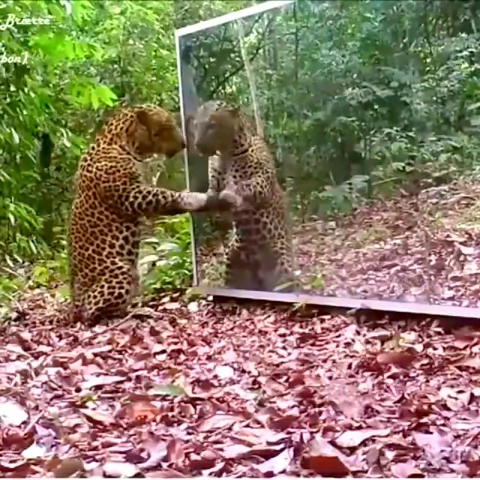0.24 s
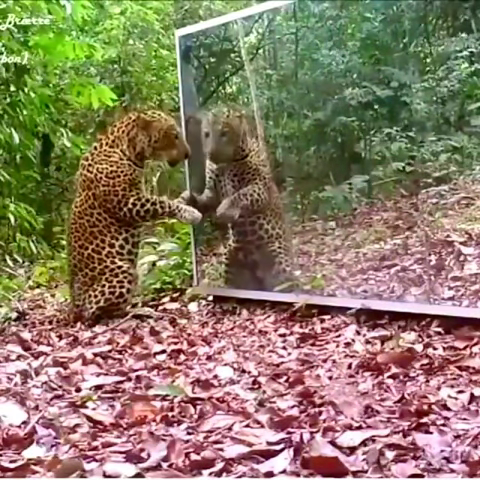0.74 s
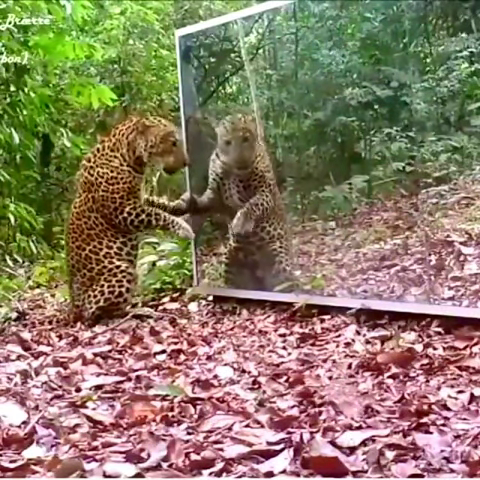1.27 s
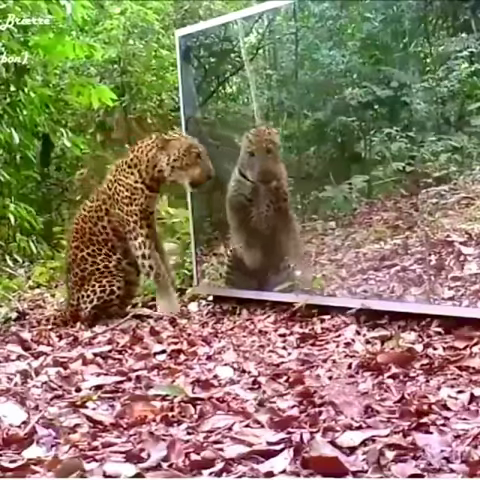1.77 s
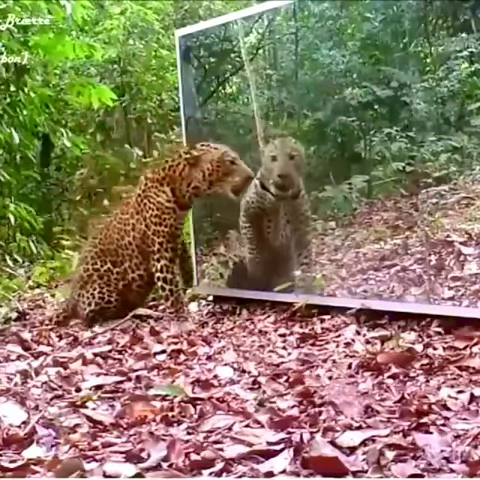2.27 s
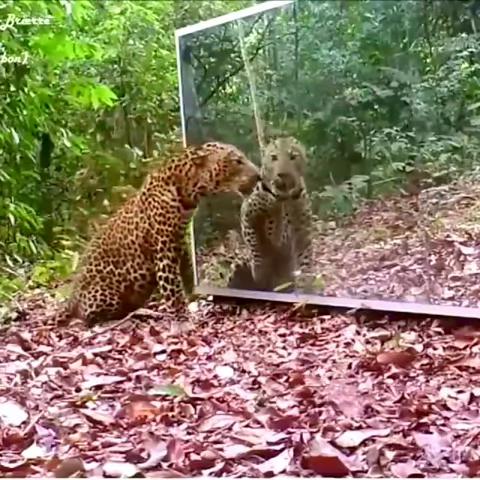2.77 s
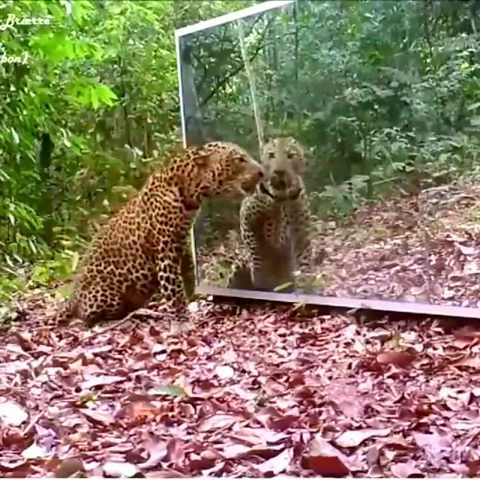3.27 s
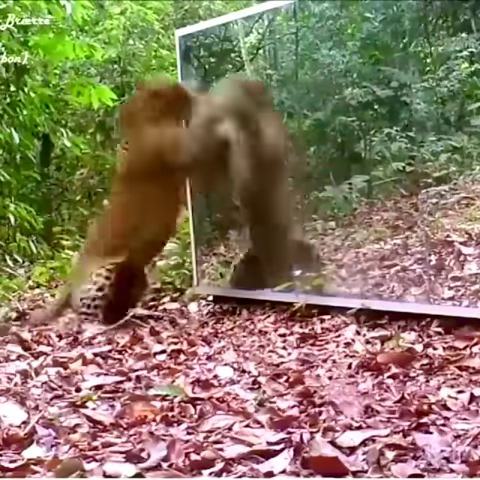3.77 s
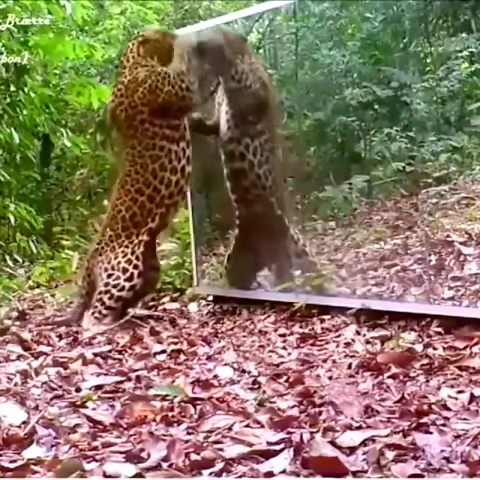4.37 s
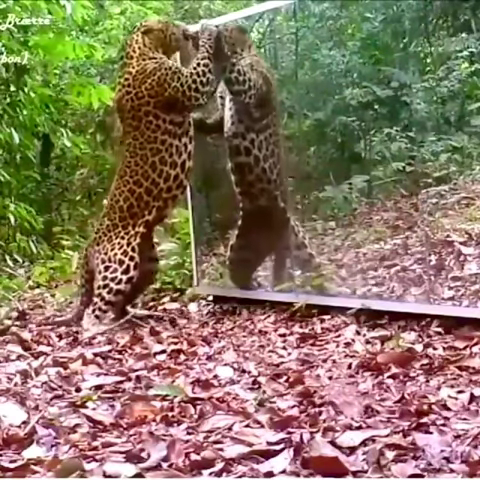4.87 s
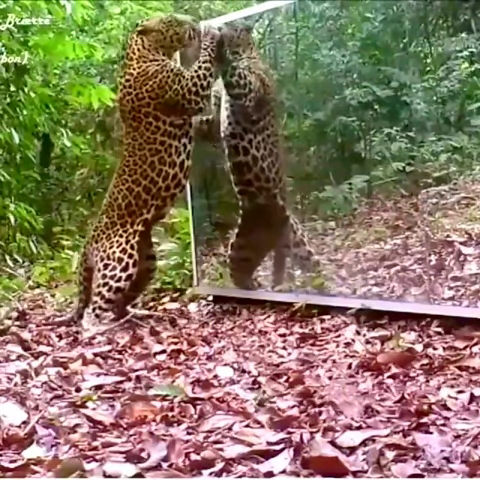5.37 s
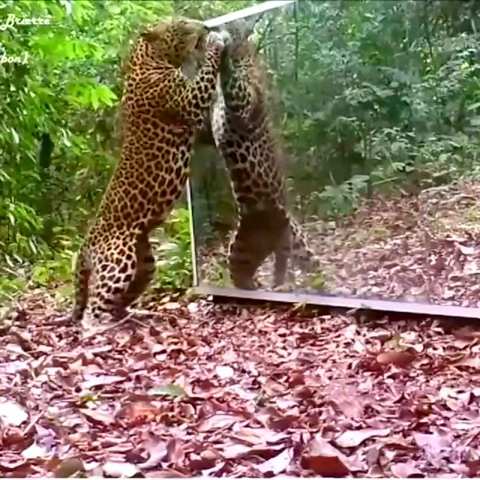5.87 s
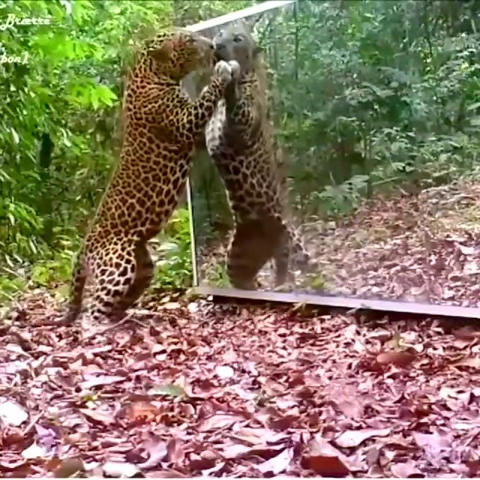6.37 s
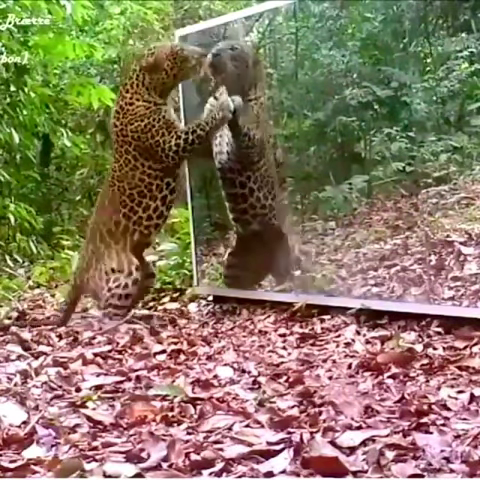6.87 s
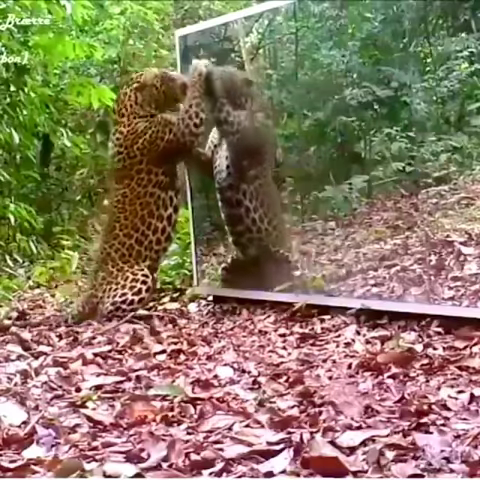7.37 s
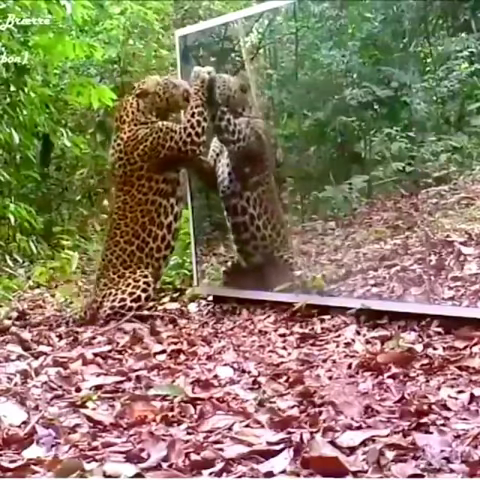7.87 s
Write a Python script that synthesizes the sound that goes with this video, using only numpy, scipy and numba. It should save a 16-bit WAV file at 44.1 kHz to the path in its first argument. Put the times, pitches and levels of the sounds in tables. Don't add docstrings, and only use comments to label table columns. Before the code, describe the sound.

A leopard close to the microphone purrs low, bursts into a loud rattling growl, then snarls and snaps amid hissing forest insects.

```python
import sys
import numpy as np
from scipy import signal
from scipy.fft import rfft, irfft, next_fast_len
from scipy.io import wavfile
from scipy.ndimage import uniform_filter1d, map_coordinates
from numba import njit

SR = 44100
rng = np.random.default_rng(int(sys.argv[2]) if len(sys.argv) > 2 else 0)


def generate_wav(sig):
    pcm = np.round(np.clip(np.atleast_2d(sig).T, -1, 1) * 32767).astype(np.int16)
    wavfile.write(sys.argv[1], SR, pcm)


def ratio_of_db(decibels):
    return 10 ** (np.asarray(decibels, float) / 20)


N = 358265


def unit(x):
    return x / np.sqrt(np.mean(x ** 2) + 1e-20)


def curves(rows):
    s, *cols = np.transpose(rows)
    return [np.interp(np.arange(N) / SR, s, c) for c in cols]


def wobble(rate):
    knots = rng.standard_normal(int(N * rate / SR) + 4)
    return map_coordinates(knots, [np.arange(N) * rate / SR])


def filtered(x, response):
    m = next_fast_len(N + SR // 2)
    return irfft(rfft(x, m) * response(np.fft.rfftfreq(m, 1 / SR)), m)[..., :N]


def soft_band(f, hz, width_hz):
    return (1j * f * width_hz / (hz ** 2 - f * f + 1j * f * width_hz)) ** 2


def echoes(x, t60):
    tail = rng.standard_normal(SR // 2) * ratio_of_db(-60 * np.arange(SR // 2) / SR / t60)
    return signal.fftconvolve(x, tail / np.linalg.norm(tail))[:N]


# f/Hz, level/dB per Hz
FOREST = [(15, -32), (25, 11), (252, -2), (288, -6), (346, -3.5), (781, -9), (1410, -9), (2420, -15.5),
          (3900, -15), (5600, -26), (7280, -61.5), (12300, -120)]
FOREST_DB = -38
# f/Hz, width/Hz, level/dB, waver/dB
INSECTS = [
    (1428, 37, -56.5, 2),
    (2310, 560, -47, 2),
    (3920, 180, -52.5, 2.5),
]


def forest():
    f, db = np.transpose(FOREST)
    air = filtered(rng.standard_normal(N), lambda hz: ratio_of_db(np.interp(np.log(hz + 1), np.log(f), db)))
    sound = ratio_of_db(FOREST_DB - 1.5 + .8 * wobble(3)) * unit(air)
    for hz, width_hz, level_db, waver_db in INSECTS:
        band = filtered(rng.standard_normal(N), lambda f: np.exp(-((f - hz) / width_hz) ** 2))
        sound += ratio_of_db(level_db + waver_db * (wobble(3.0) + wobble(13))) * unit(band)
    return sound


# t/s, peak level/dB
CHIRPS = [
    (0.21, -29),
    (4.302, -31.5),
    (5.201, -34),
    (7.807, -32),
]


def bird():
    t = np.arange(int(.035 * SR)) / SR
    hz = 2480 - 300 * np.exp(-t / 0.015)
    note = np.sin(2 * np.pi * np.cumsum(hz) / SR) * np.sin(np.pi * t / t[-1]) ** 0.085
    calls = np.zeros(N + len(t))
    for s, db in CHIRPS:
        calls[round(s * SR):][:len(t)] += ratio_of_db(db) * note
    return calls[:N] + 1.3 * echoes(calls[:N], t60=1.0)


# t/s, peak level/dB, f/Hz
FLUTTERS = [(1.773, -5.5, 2060), (1.796, -18, 2490), (1.808, -7, 2095), (1.858, -8.5, 2070),
            (1.93, -17, 2000), (1.98, -12, 2074), (2.008, -12, 2040), (2.02, -6, 2077), (2.034, -9.5, 2064),
            (2.068, -12, 2040), (2.101, -6, 2035), (2.146, -8, 1970), (2.186, -15, 1985),
            (2.235, -17, 2040), (2.272, -20.5, 1980), (6.55, -20, 1840), (6.62, -21.5, 2610),
            (6.892, -12.5, 2630), (6.929, -12, 1960), (6.942, -12, 2110), (6.955, -14, 1854),
            (7.025, -9, 1934), (7.036, -16, 1895), (7.11, -17, 2624), (7.125, -15, 2170)]
FLUTTER_S = 0.0029


def flutters():
    out, t = np.zeros(N + SR), np.arange(SR // 20) / SR
    swell = t / FLUTTER_S * np.exp(1 - t / FLUTTER_S)
    for s, db, hz in FLUTTERS:
        out[round(s * SR):][:len(t)] += ratio_of_db(db) * np.sin(2 * np.pi * hz * t) * swell
    return out[:N]


# t/s, peak level/dB, ring f/Hz, crack share/0-1
SNAPS = [(1.81, -6.5, 2080, 0.35), (2.018, -4, 2080, 0.03), (3.527, -6.5, 1800, .5),
         (3.551, -9.5, 1850, .5), (2.068, -14.5, 2050, 0), (2.254, -11.5, 3200, 0.9), (2.378, -17, 2900, 0),
         (3.597, -6.5, 1450, 0), (3.648, -15, 2400, 0.5), (3.702, -3.5, 1400, 0.6), (3.981, -12, 1850, 0),
         (6.521, -10, 2300, 0.15), (6.64, -15.5, 2500, 0.5), (6.712, -12.5, 2600, 0.13),
         (6.725, -6, 1950, 0.1), (6.822, -15, 2300, 0.48), (6.894, -9.5, 2620, 0.24), (6.95, -9, 2000, 0),
         (7.027, -7, 2000, .1), (2.872, -11.5, 2100, 0.54), (3.264, -16.5, 2150, 0.07),
         (3.311, -18, 2130, 0), (3.788, -3, 2800, 0.02), (4.138, 6.5, 1828, 0.18), (4.301, -19, 2890, 0.26),
         (4.786, -21.5, 3160, 0), (4.421, -11.5, 2415, 0.06), (4.459, -14.5, 2530, 0.05),
         (5.287, -9.5, 2670, 0.4), (6.151, -11.5, 2700, 0.71), (6.575, -6.5, 2230, 0.25),
         (6.673, -9, 2660, 0.07), (7.047, -14.5, 4150, 1), (7.058, -10, 3170, 0), (7.139, -7.5, 3700, 0.23)]


def snaps():
    out, t = np.zeros(N + SR), np.arange(SR // 20) / SR
    for s, db, hz, share in SNAPS:
        tone = 2 * np.pi * hz * t
        ring = np.sin(tone) * ratio_of_db(-60 * t / 0.026) * (1 - np.exp(-t / 0.00042))
        dull = uniform_filter1d(uniform_filter1d(rng.standard_normal(len(t)), size=12), size=12)
        crack = 7 * dull * np.cos(tone) * ratio_of_db(-60 * t / 0.008)
        out[round(s * SR):][:len(t)] += ratio_of_db(db + 1.0) * ((1 - share) * ring + share * crack)
    return filtered(out[:N], lambda f: soft_band(f, 2400, 2600))


# t/s, effort level/dB, gape of the jaws/dB, lips drawn back/dB
MUTTER = [(0.0, -64, -23, -23), (0.014, -42.5, -6, 4.5), (0.276, -36, -17, -3.5),
          (0.468, -37.5, -10, -12.5), (0.52, -38, -5.5, -13)]
PURR = [(0.56, -39, -1.5, -12), (0.586, -38, -0.5, -3.5), (0.704, -39.5, 5, -6.5), (0.71, -36, 3, 3),
        (0.874, -35, 3.5, -18), (0.9, -35.5, 5, -2), (1.334, -31.5, -10, -9.5), (1.444, -40.5, -8, -4),
        (1.5, -51, 7, -8)]
GROWL = [(1.56, -65, 8.5, -2), (1.586, -42, -13, 3.5), (1.808, -16.5, -9.5, 0), (1.88, -14, -10.5, -11),
         (2.046, -14, -11, -6), (2.304, -20, -8, -12.5), (2.476, -16, -8.5, -14), (2.585, -24, -6.5, -10),
         (2.66, -88, -27, 9)]
RUMBLE = [(2.79, -63, -4, 4.5), (2.831, -28.5, -8, -42), (3.007, -35, -30, -17.5), (3.38, -30, -21, 1.5),
          (3.44, -28, -28.5, -7)]
LUNGE = [(3.465, -27.5, -17, 10.5), (3.491, -27, -4, 2.5), (3.547, -20.5, -3, -3.5), (3.607, -22, 9.5, -4),
         (3.637, -18, -11.5, -7.5), (3.655, -24.5, 16.5, 6)]
SNARL = [(3.665, -22.5, 12.5, -11), (3.689, -26.5, 5.5, 13), (3.825, -31, 6, 1.5), (3.877, -28.5, 0.5, -6),
         (3.887, -32, 11, 2.5), (3.921, -30.5, 10.5, 4.5), (4.019, -43.5, 10, 2), (4.06, -25.5, -17, -15)]
GRUMBLE = [(4.09, -35.5, 5, 4.5), (4.15, -28.5, 6.5, 4.5), (4.212, -38.5, -3, -6.5),
           (4.376, -34.5, -3.5, 2), (4.68, -35, -17.5, -8.5), (4.882, -35.5, -9, -2),
           (5.008, -37.5, -24.5, -12), (5.314, -37, -11.5, -10), (5.46, -50.5, -11, -11)]
DRAW = [(5.5, -36.5, -18.5, -3.5), (5.532, -35.5, -2.5, -25), (5.558, -50.5, 1, 3.5),
        (5.756, -37.5, -0.5, -4), (6.25, -39.5, 4.5, 9.5), (6.318, -30, -2, 0.5), (6.746, -28, -21.5, -3.5),
        (6.786, -46.5, -19, 8), (6.82, -55, 1, 18.5)]
HISS = [(6.851, -59, 10.5, 20.5), (6.868, -34, -23.5, 6), (6.93, -37.5, 0.5, 16.5),
        (6.954, -39.5, 6.5, 18.5), (7.212, -35, -9.5, -1.5), (7.226, -37, 8.5, 9.5),
        (7.286, -38.5, -11, 2.5), (7.466, -34, -19.5, -15), (7.5, -42, -10.5, -10)]
FADE = [(7.54, -36.5, -10, -10), (7.59, -41, -15, -10), (7.928, -39.5, -15.5, -9), (8.12, -69.5, 6, 19)]
PHRASES = [MUTTER, PURR, GROWL, RUMBLE, LUNGE, SNARL, GRUMBLE, DRAW, HISS, FADE]


def held(start, end):
    edges = [(rows[0][0], rows[-1][0]) for rows in PHRASES]
    return np.interp(np.arange(N) / SR, np.ravel(edges), np.ravel(np.c_[start, end]))


# t/s, effort level/dB, gape/dB
PUSHES = [(.016, 4.5, -8.5), (1.743, -1.5, 4), (1.777, 0.5, -4.5), (1.898, 3, 0.5), (1.973, 2, -1),
          (2.018, 2, 2.5), (2.066, -4.5, 3.5), (2.49, 4.5, -3), (2.829, 2.5, -14), (3.455, -6.5, 3),
          (3.525, 8, -0.5), (3.575, 2, 1), (3.624, -4, -3), (3.678, 6.5, 3), (3.708, 4.5, 9.5),
          (3.727, -1.5, 2.5), (3.757, -0.5, -2.5), (3.822, -6, 0.5), (3.857, 5.5, 4.5), (3.887, 2.5, 3),
          (3.914, 1, 0.5), (3.943, 1.5, 0.5), (4.137, 2.5, -3), (4.745, 16, -16), (5.28, 10, 17),
          (6.236, 0.5, -1), (6.337, 1.5, 2), (6.388, 1.5, 0.5), (6.426, 0.5, 0.5), (6.52, 1.5, -0.5),
          (6.615, 3, -4.5), (6.672, 2, -4.5), (6.724, 1, 5), (6.568, 5.5, -7.5), (6.901, 2, 2.5),
          (6.931, -3.5, 7), (7.032, 10.5, 2.5), (6.97, -4, 3.5), (7.107, 10, -1.5), (7.226, 1, 1)]
PUSH_RISE_S, PUSH_FALL_S = 0.0017, 0.027


def effort():
    effort_db, gape_db, lips_db = curves(sum(PHRASES, []))
    s, push_db, open_db = np.transpose(PUSHES)
    late = np.arange(N) / SR - s[:, None]
    shape = np.exp(-np.where(late < 0, late / PUSH_RISE_S, late / PUSH_FALL_S) ** 2)
    return effort_db + push_db @ shape, gape_db + open_db @ shape, lips_db


# t/s, slaps so far/count
SLAPS = [
    [(.016, 0), (.234, 4), (.392, 7), (.614, 11), (.762, 14), (1.317, 26), (1.419, 28)],
    [(1.693, 0), (1.745, 1), (1.808, 3), (1.896, 5), (1.928, 6), (2.067, 9), (2.102, 10), (2.272, 14),
     (2.493, 19), (2.565, 21)],
    [(2.829, 0), (2.915, 2), (3.456, 13)],
    [(3.496, 0), (3.526, 1), (3.648, 6), (3.679, 7), (3.727, 9), (3.785, 11), (3.859, 13), (3.943, 16),
     (3.98, 17)],
    [(4.071, 0), (4.135, 2), (4.268, 5), (4.301, 6), (4.536, 12), (4.741, 17), (4.826, 19), (5.013, 23),
     (5.372, 30)],
    [(5.515, 0), (5.779, 6), (5.841, 7), (5.907, 9), (6.012, 11), (6.148, 15), (6.235, 17), (6.336, 20),
     (6.52, 24), (6.575, 25), (6.615, 26), (6.672, 27), (6.724, 28)],
    [(6.888, 0), (7.018, 3), (7.097, 5), (7.226, 8), (7.263, 9), (7.367, 11), (7.405, 12), (7.617, 16),
     (7.741, 18)],
    [(7.888, 0), (7.949, 1), (8.085, 4)],
]


def folds(scatter_db):
    breaths = [np.transpose(rows) for rows in SLAPS]
    times = [np.interp(np.arange(n[-1] + 1), n, s) for s, n in breaths]
    gaps = np.concatenate([np.gradient(t) for t in times])
    at = np.round(np.concatenate(times) * SR).astype(int)
    size_db = scatter_db * rng.standard_normal((len(at), len(WIDTHS)))
    slaps = np.zeros((len(WIDTHS), N))
    slaps[:, at] = np.sqrt(gaps * SR) * ratio_of_db(size_db).T
    last = np.maximum.accumulate(np.where(slaps[0] > 0, np.arange(N), 0))
    return slaps, (np.arange(N) - last) / SR


def gusts(air, age, leak):
    gate = leak * air ** 2 + np.exp(-age / .012)
    gate = gate / np.sqrt(np.abs(uniform_filter1d(gate ** 2, size=SR // 16)))
    return gate * unit(ratio_of_db(2.88 * wobble(70)) * rng.standard_normal(N))


# f/Hz, width/Hz, level/dB
RASP = [
    (2950, 260, 1.5),
    (3500, 200, 1.5),
    (3990, 180, -0.5),
    (4700, 580, -2.5),
]


def teeth_rasp(flow, age):
    spit = flow * ratio_of_db(3.5 * wobble(28)) * (1.3 + np.exp(-age / .015))
    return unit(filtered(spit, lambda f: sum(ratio_of_db(db) * np.exp(-((f - c) / w) ** 2) for c, w, db in RASP)))


# t/s, f/Hz
CHEST = [(0, 142), (.5, 130), (1.4, 133), (1.75, 153.3), (1.9, 160.6), (2.05, 155), (2.3, 146.4),
         (2.6, 146.7), (2.8, 127), (3.44, 128), (3.5, 167.6), (3.65, 164), (3.8, 136), (4.1, 132.4),
         (5.4, 124), (5.8, 146), (6.3, 141.3), (6.75, 130), (7, 146.5), (8.12, 129)]
# throat f/Hz, upper throat f/Hz at start, at end, its level/dB, tongue tip f/Hz
THROAT = [(274, 540, 450, -4, 3330), (291.3, 584, 584, -9, 4100), (302.5, 603, 629, -7.5, 3490),
          (311, 550, 730, -4, 3300), (352, 608, 610, -2, 2400), (328, 620, 680, -4, 3150),
          (286.6, 571, 485, 1, 3300), (290, 662, 670, 0, 2820), (315, 670, 674, 3.5, 3400),
          (282, 1200, 480, -8, 3200)]
SHAKE = [.004, .012, .012, .02, .014, .03, .035, .05]
SPRING_S = 0.0059


def tract_hz(air, age, pull, tongue, nose, lip, front):
    throat, upper, upper_end, _, tip = np.transpose(THROAT)
    throat, upper, tip = held(throat, throat), held(upper, upper_end), held(tip, tip)
    hz = np.array([curves(CHEST)[0], throat, upper, tongue, nose, lip, front, tip])
    hz[3:5] *= 1 - pull * np.exp(-age / SPRING_S)
    hz *= 1 + air * np.array([share * wobble(35) for share in SHAKE])
    hz[5:] *= 1 - 0.064 * np.exp(-age / 0.0087)
    return hz


def shared(*db):
    total = np.sqrt(sum(ratio_of_db(d) ** 2 for d in db))
    return [ratio_of_db(d) / total for d in db]


# front level/dB, tongue tip level/dB at start, rasp over mouth/dB at start, at end
FANGS = [(27, 11.5, -18.5, -30), (-4.5, -12, -15.5, -23), (-3.5, -38.5, 4, -15), (2, -28, -25, -8.5),
         (2, -0.5, -6.5, -23.5), (0, -17, -20.5, -21), (6, -12, -21.5, -17.5), (1.5, 2.5, -33, -9),
         (-0.5, -14, -16, -24), (13, -11, -21, -25)]
TIP_END_DB = [36.5, -27, 5.5, -25.5, -19, -23, 17, -2.5, -7.5, -4]
CLOSING = 0.068


def tract_gains(chest_db, gape_db, lips_db, opening_db, nose_db):
    upper_db = np.transpose(THROAT)[3]
    front_db, tip_db = np.transpose(FANGS)[:2]
    upper_db, front_db, tip_db = held(upper_db, upper_db), held(front_db, front_db), held(tip_db, TIP_END_DB)
    front_db, tip_db = front_db - CLOSING * gape_db, tip_db - CLOSING * gape_db
    gain = [ratio_of_db(chest_db + 2.0)]
    gain += [ratio_of_db(chest_db + gape_db + 2.0) * g for g in shared(0, upper_db)]
    mouth_db = mouth_level(chest_db + gape_db)
    gain += [ratio_of_db(mouth_db + 1.0) * g for g in shared(0, nose_db)]
    gain[4] *= ratio_of_db(opening_db)
    gain += [ratio_of_db(chest_db + lips_db + 2.0) * g for g in shared(0, front_db, tip_db)]
    return np.array(gain)


# mouth over throat/dB at start, at end, nose level/dB at start, at end
MOUTH = [(4, 3, -20, -10.5), (1.5, -12, -20.5, -6.5), (-15, 1.5, -12.5, 10.5), (4.5, 23.5, 7, 31),
         (15, -5, 10.5, 12), (1.5, 0.5, 6, -25), (2, -4, -16.5, -0.5), (-13.5, 7.5, -19, -3),
         (3, -1, 3, -15), (-15, -12, -9, 7)]


def mouth_level(throat_db):
    mouth_db, mouth_end_db = np.transpose(MOUTH)[:2]
    return throat_db + held(mouth_db, mouth_end_db)


# t/s, peak level/dB
HEAVES = [(1.742, -13.5), (1.804, -13.5), (1.845, -8.5), (1.881, -8), (1.921, -9), (1.954, -4.5),
          (2.003, -6), (2.034, -7), (2.067, -11), (2.122, -6), (2.205, -9.5), (2.256, -8)]


def add_heaves(chest_drive):
    s, heave_db = np.transpose(HEAVES)
    edges = [s[0] - .05, s[0], s[-1], s[-1] + .05]
    chest_drive *= np.interp(np.arange(N) / SR, edges, [1, .36, .36, 1])
    chest_drive[np.round(s * SR).astype(int)] += ratio_of_db(heave_db + 23.5)


@njit
def recurse(x, a, b):
    y = np.zeros_like(x)
    for k in range(x.shape[0]):
        for n in range(2, x.shape[1]):
            y[k, n] = x[k, n] + a[k, n] * y[k, n - 1] - b[k, n] * y[k, n - 2]
    return y


def resonate(x, hz, width_hz, skirt_hz):
    bend = np.cos(2 * np.pi * hz / SR)
    r, q = np.exp(-np.pi * width_hz / SR), np.exp(-np.pi * skirt_hz / SR)
    a, b = 2 * r * bend, r * r
    narrow = recurse(x * np.sqrt((1 - b) * ((1 + b) ** 2 - a * a) / (1 + b)), a, b)
    peak = (1 - q) * np.sqrt((1 + q) ** 2 - 4 * q * bend ** 2)
    return recurse(narrow * peak, 2 * q * bend, q * q)


WIDTHS = [40, 32, 38, 22, 32, 55, 75, 85]
SKIRTS = [140, 130, 201, 210, 221, 377, 444, 440]
LOOSEN = [-.45, -.15, .1, .9, .6, .7, 1.8, 4]
JAW_LOSS, JAW_OPEN_DB = .2, 5
DAMP, DAMP_S = 12, .02


def ring_tract(drive, hz, air, age, pull, gape_db):
    loose = 1 + np.outer(LOOSEN, air)
    loose[1:] += JAW_LOSS * np.clip(gape_db - JAW_OPEN_DB, 0, None)
    loose[1:6] += DAMP * pull * np.clip(age / DAMP_S, 0, 1.5) ** 3
    rows = resonate(drive, hz, np.c_[WIDTHS] * loose, np.c_[SKIRTS] * np.sqrt(loose))
    return rows[1::2].sum(0) - rows[0::2].sum(0)


# t/s, air share/0-1, tongue f/Hz, lip f/Hz, front f/Hz
TRACT = [(0, 0.2, 1425, 1900, 2640), (.7, 0.43, 1172, 1937, 2990), (1.42, 0.2, 995, 1870, 2680),
         (1.75, 0.9, 1064, 2160, 2570), (1.9, 0.9, 1047, 2070, 2590), (2.2, 0.79, 994, 2065, 2530),
         (2.58, 0.9, 893, 2020, 2530), (2.8, 0, 940, 2240, 2770), (3.41, 0.38, 1098, 2040, 2616),
         (3.46, 1, 1090, 2350, 2560), (3.52, 0.7, 1044, 2270, 2650), (3.6, .45, 1120, 2270, 2600),
         (3.66, 0.3, 1193, 2200, 2670), (3.72, 0.16, 1375, 2120, 2750), (3.77, 0.5, 1185, 2080, 2530),
         (3.89, 0.4, 1283, 1870, 2330), (3.98, 0.5, 1122, 1800, 2270), (4.2, 0.49, 1063, 1920, 2625),
         (5.38, 0.02, 1005, 1940, 2490), (5.55, 0.7, 1110, 1940, 2520), (6.1, .78, 1050, 1837, 2290),
         (6.5, 0.9, 1040, 1860, 2250), (6.7, 0.8, 1025, 1960, 2530), (6.86, 1, 1060, 2100, 2600),
         (6.95, 1, 1175, 1910, 2510), (7.03, 0.7, 1054, 1965, 2400), (7.11, 0.88, 1076, 1970, 2630),
         (7.17, 0.8, 1115, 2000, 2490), (7.24, 0.43, 1204, 1983, 2644)]
# t/s, nose f/Hz, share by which each slap pulls tongue and nose down, nose opening/dB
PALATE = [(0, 1466, 0.015, 1.5), (1.5, 1525, 0.011, 1.5), (2.1, 1494, 0.016, -1), (2.6, 1500, 0.0095, -1),
          (3.4, 1530, 0.025, 0.5), (3.47, 1490, .05, -6.5), (3.5, 1510, 0.11, -3.5), (3.52, 1600, 0.1, -1),
          (3.56, 1513, 0.085, -3.5), (3.585, 1316, 0.14, -9.5), (3.615, 1520, .14, -4),
          (3.635, 1400, .1, -2), (3.66, 1573, 0.12, 4), (3.75, 1435, 0.091, -3), (3.86, 1510, 0.093, -6),
          (4.05, 1492, 0.033, 4.5), (6, 1510, 0.014, 0), (6.55, 1500, 0.013, -6), (6.72, 1510, 0.016, 12),
          (6.9, 1470, 0.08, 3.5), (7.1, 1460, 0.082, -1), (8.12, 1470, .02, 0)]
# t/s, extra air share in the mouth/0-1, rasp level/dB
TEETH = [(0, 0.56, -1), (1.5, 0, -1), (1.75, 0.05, 2), (2.16, 0.5, 1), (2.3, 1, 4.5), (2.6, 1, 6.5),
         (2.8, 0.25, -1), (3.46, 0.17, 0), (3.6, .1, 0.5), (3.64, 0.03, 2), (3.7, 0.2, 17), (3.76, 0.6, 19),
         (3.85, 0, 5.5), (4.05, 0.1, 4), (5.4, 0.33, -2), (6.1, 0.3, 1), (6.75, .05, 3.5), (6.85, .5, 18.5),
         (7.1, 0.2, 0.5), (7.3, 0.5, 10)]
AIRY = [2, 1.5, 1.2, 1, 1, 1, 1, 1]
BELLY_HZ, BELLY_WIDTH_HZ, BELLY_DB = 108, 30, 5


def cat():
    chest_db, gape_db, lips_db = effort()
    air, tongue, lip, front = curves(TRACT)
    air = np.clip(air, .001, 1)
    nose, pull, opening_db = curves(PALATE)
    hiss, teeth_db = curves(TEETH)
    slaps, age = folds(scatter_db=1.6)
    hz = tract_hz(air, age, pull, tongue, nose, lip, front)
    nose_db = held(*np.transpose(MOUTH)[2:])

    deep = gusts(air, age, leak=3)
    rush = gusts(np.maximum(air, hiss), age, leak=1.1)
    airy = air ** np.c_[AIRY]
    airy[3:] += (1 - airy[3:]) * np.clip(hiss, 0, 1)
    source = np.sqrt(1 - airy) * slaps + np.sqrt(airy) * np.array([deep] * 3 + [rush] * 5)
    drive = tract_gains(chest_db, gape_db, lips_db, opening_db, nose_db) * source
    drive[1:5] *= ratio_of_db(2.5 * air * np.array([wobble(40) for _ in range(4)]))
    add_heaves(drive[0])

    voice = ring_tract(drive, hz, air, age, pull, gape_db)
    voice += ratio_of_db(BELLY_DB) * filtered(air * drive[0], lambda f: soft_band(f, BELLY_HZ, BELLY_WIDTH_HZ))
    voice = filtered(voice, lambda f: 1j * f / (50 + 1j * f))
    rasp_db = mouth_level(chest_db + gape_db) * 0 + held(*np.transpose(FANGS)[2:]) + teeth_db
    rasp_db += held(*np.transpose(MOUTH)[:2]) + chest_db + gape_db
    voice += ratio_of_db(rasp_db) * air * teeth_rasp(deep, age)
    voice += snaps() + flutters()
    return voice + echoes(voice, t60=.25) / 5


def scene():
    return (forest() + bird() + cat())[None]


def band_limit(x):
    return signal.sosfilt(signal.butter(12, 15680, fs=SR, output="sos"), x)


# t/s, level/dB
STUMBLES = [
    (0.8, -3),
    (1.432, -2),
    (3.368, -6),
    (4.118, -11),
    (4.485, -4.5),
    (4.625, -2.5),
    (5.122, 2.5),
    (5.931, -3),
    (7.725, -2),
]


def record(dry):
    x = filtered(dry, lambda hz: np.clip((5650 - hz) / 350, 0, 1) * hz / np.hypot(hz, 45))
    duck_db = sum(db * np.exp(-((np.arange(N) / SR - s) / 0.017) ** 2) for s, db in STUMBLES)
    x = x + (ratio_of_db(duck_db) - 1) * filtered(x, lambda hz: hz > 450)
    overloaded = x / (1 + np.abs(x / 0.71) ** 18) ** (1 / 18)
    x = filtered(overloaded, lambda hz: np.clip((15700 - hz) / 1800, 0, 1))
    hiss = filtered(rng.standard_normal(N), lambda hz: np.exp(-((hz - 10300) / 2600) ** 2))
    mix = x + ratio_of_db(-96) * hiss
    return band_limit(mix)


dry = scene()
out = record(dry)
generate_wav(out)
```